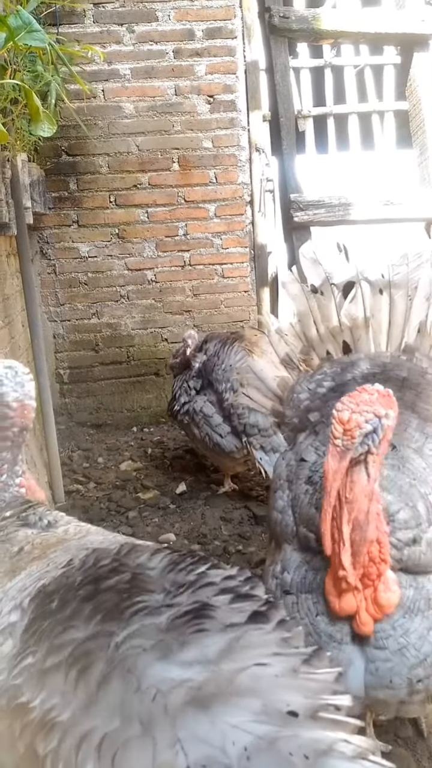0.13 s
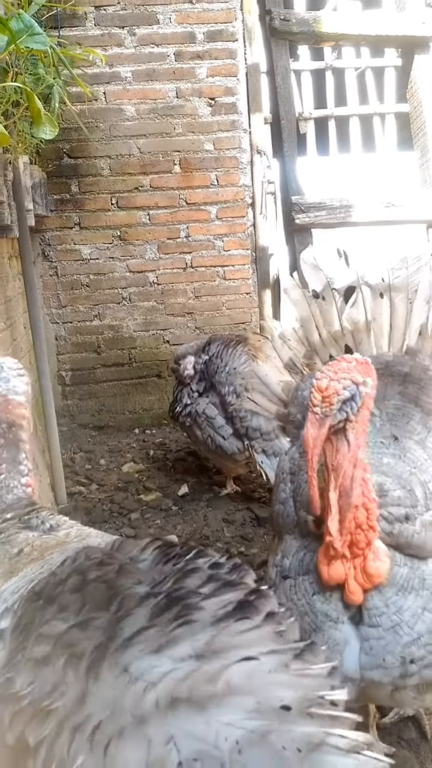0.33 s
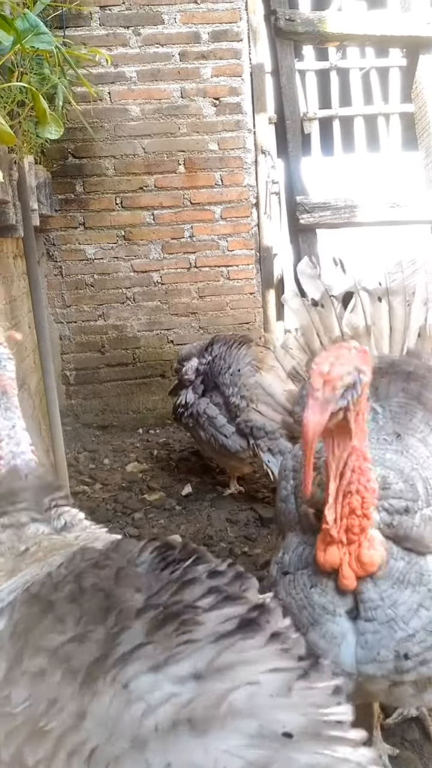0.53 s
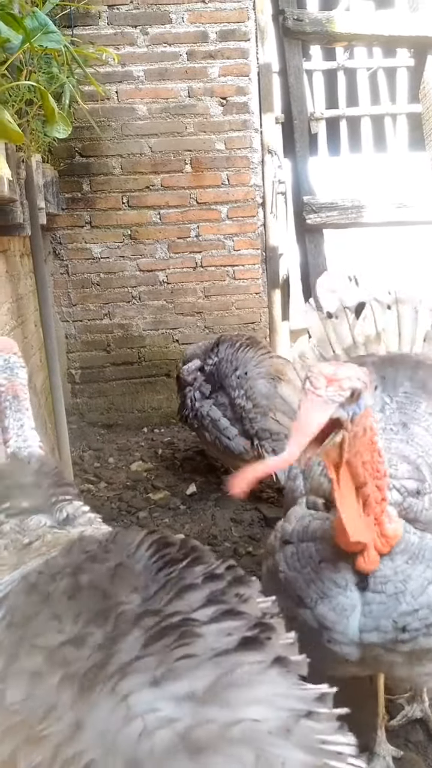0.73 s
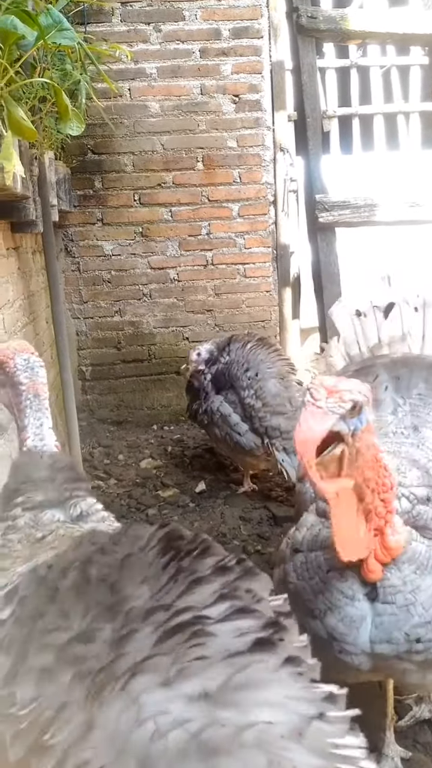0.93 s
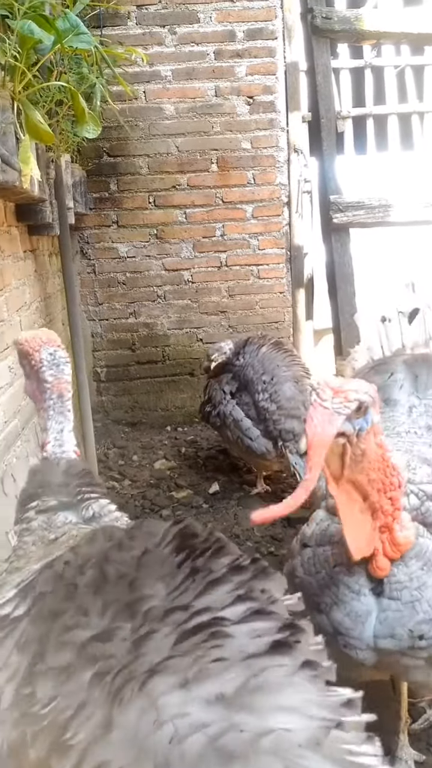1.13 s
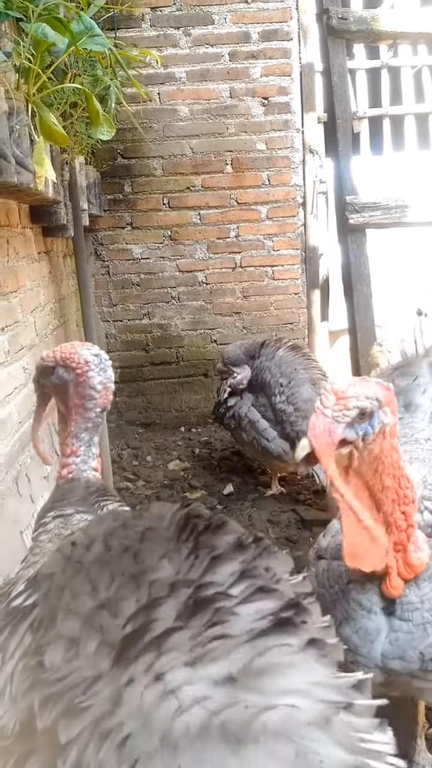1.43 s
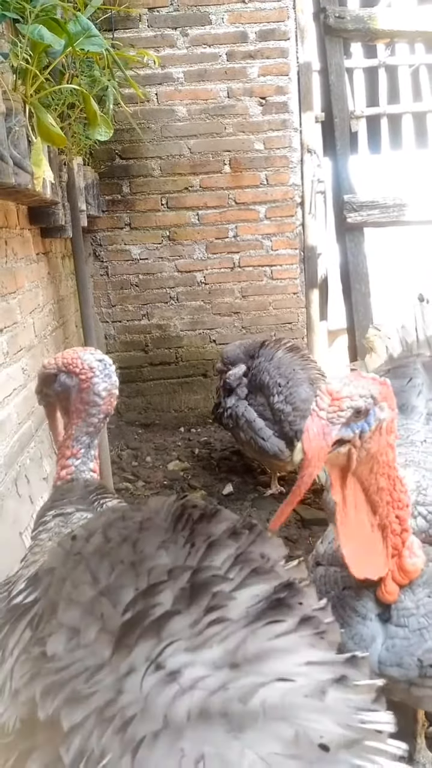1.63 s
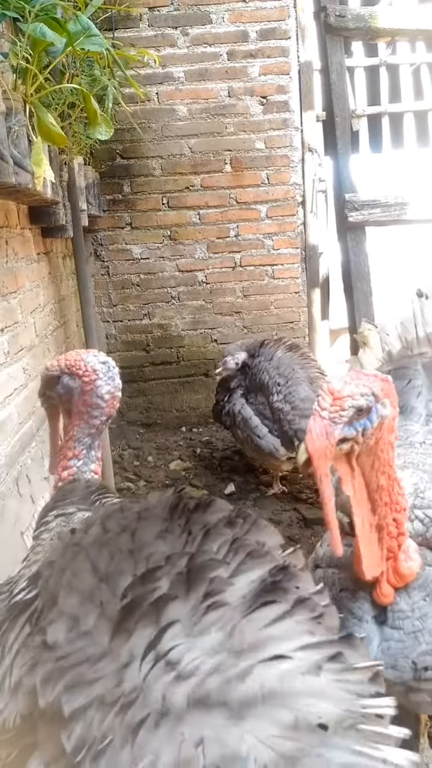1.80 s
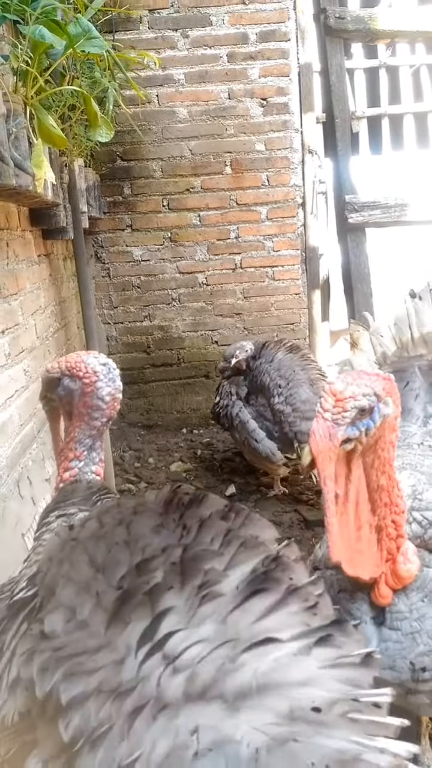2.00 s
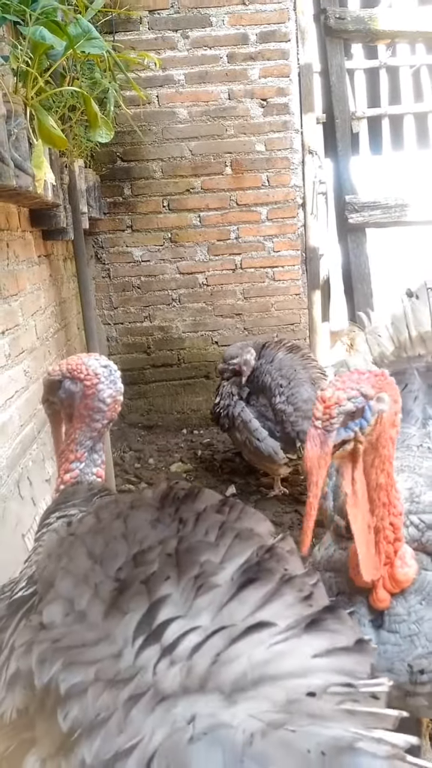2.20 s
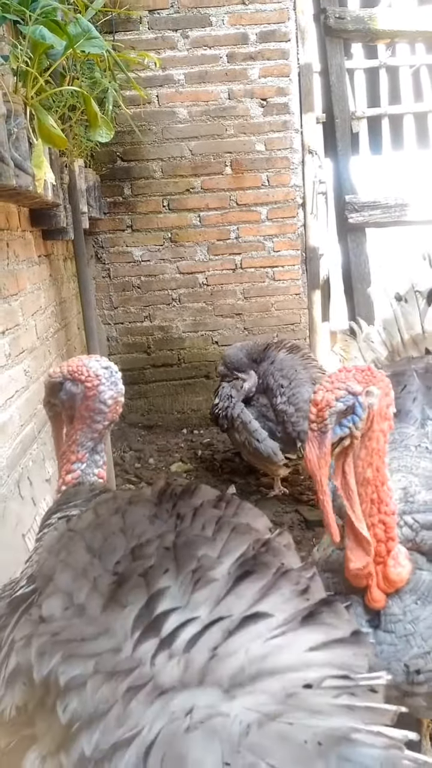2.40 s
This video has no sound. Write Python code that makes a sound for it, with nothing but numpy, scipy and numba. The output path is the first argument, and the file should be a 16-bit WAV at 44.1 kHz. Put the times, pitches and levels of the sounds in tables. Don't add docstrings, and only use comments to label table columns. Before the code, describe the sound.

Turkey gobbling, close and loud in a small walled yard. After near quiet, the nearest bird starts at 0.2 seconds with fast, clear, rising nasal notes, peaking in an open cry near 0.6. Hoarse birds roll along behind while another answers with gulps and squawks until 1.2. Then faint, blurred far calls fade by about 2.1, leaving soft hiss, thin insect whine and tiny feather ticks near 2.3.

```python
import sys
import numpy as np
from scipy import signal
from scipy.fft import rfft, irfft
from scipy.io import wavfile
from scipy.ndimage import uniform_filter1d
from numba import njit

SR = 44100
rng = np.random.default_rng(int(sys.argv[2]) if len(sys.argv) > 2 else 0)


def field_ratio(decibels):
    return 10 ** (np.asarray(decibels, dtype=float) / 20)


def inscribe(sig):
    pcm = np.round(np.clip(np.atleast_2d(sig).T, -1, 1) * 32767)
    wavfile.write(sys.argv[1], SR, pcm.astype(np.int16))


N = 112454
t = np.arange(N) / SR

# frequency [Hz], level [dB per Hz].
HUM_SPECTRUM = [(18, -50.5), (30, -23.5), (86, -2), (236, -26.5), (450, -21), (580, -54), (990, -120)]
# frequency [Hz], level [dB per Hz].
AIR_SPECTRUM = [(18, -34.5), (30, 2), (4400, -18.5), (4750, -10), (5270, -18), (14000, -22.5)]
# frequency [Hz], width [Hz], level [dB].
INSECT_LINES = [(4745, 130, -72), (5700, 70, -88), (3700, 90, -88)]
# start [s], length [s], level [dB], centre [Hz].
RUSTLES = [
    (0.006, 0.0176, -68.5, 2100),
    (1.552, 0.078, -64.5, 10330),
    (2.265, 0.0022, -64, 3530),
    (2.266, 0.003, -58.5, 1300),
    (2.285, 0.0045, -59.5, 2000),
]
# centre [Hz], width [Hz], level [dB] with closed beak, level [dB] with open beak.
THROAT = [(620, 200, -12.5, 4), (1300, 379, -8.5, -2), (2200, 390, -15.5, 5.5), (3130, 390, -20, -8),
          (4010, 990, -31, -2), (5840, 580, -46.5, -20), (8030, 1400, -38, -11.5), (10360, 1300, -34, -13),
          (12500, 3700, -55, -25.5), (218, 130, -30, -24.5)]
# time [s], level [dB], pitch [Hz], beak opening [0-1],
# mouth resonance [Hz].
LEAD_FIRST_RUN = [
    [(.182, -52, 471.6, 0.94, 2200), (.2, -25, 548.6, 0.28, 2473), (.212, -15.5, 600, 0.1, 2575),
     (.234, -14, 584.7, 0.2, 2527), (.241, -25, 544, 0.2, 2400), (.25, -21, 587, .2, 2300),
     (.272, -23, 584.5, 0.2, 2252)],
    [(.274, -20.5, 634.3, 0, 1300), (.291, -4, 674.5, 0, 1300), (.302, -11.5, 697, 0.3, 1600),
     (.318, -11, 718, 0.35, 1750), (.326, -20, 677, 0.75, 1490), (.334, -13.5, 641, 0.94, 850),
     (.342, -24.5, 640, 0.5, 1300)],
    [(.344, -18, 537.6, 0.1, 2150), (.356, -12, 571.2, 0.44, 2300), (.368, -14.5, 608.5, 0.48, 2300),
     (.378, -14, 645, 0.37, 1630), (.397, -5, 665.7, 0.24, 1364), (.415, -15, 656.8, 0.55, 1300),
     (.432, -10.5, 639.5, 0.7, 640), (.455, -26.5, 600, 0.7, 640)],
]
LEAD_SECOND_RUN = [
    [(.468, -29, 647.3, 0.3, 1437), (.49, -13.5, 640, 0.47, 1336), (.515, -20, 603.4, 0.4, 699),
     (.544, -11.5, 672, 0.8, 718), (.556, -20, 685, 0.64, 1327), (.568, -9, 683, 0.3, 1034),
     (.575, -9, 614, .9, 1356)],
    [(.578, -14.5, 665.5, .7, 3990), (.587, -6.5, 640, 1, 4101), (.595, -14, 618.5, 0.5, 3297),
     (.605, -13.5, 607.5, 0.45, 2885), (.622, -14, 606, 0.3, 2850), (.636, -11.5, 641.6, 0.57, 3289),
     (.652, -10, 716, 0.9, 3995), (.672, -30, 686, 1, 3940)],
]
LEAD_ROUGH = [.07, .04, .04, .18, .02]
# level [dB], width [Hz], lift [dB] of the 3, 4 and 6 kHz resonances.
LEAD_MOUTH = [(0.5, 580, 0, -8.5, -7.5), (3.5, 630, 0, -7.5, -2.5), (2.5, 360, -6, 4.5, 3.5),
              (2.5, 670, 2, -1, -6.5), (-5.5, 1300, -2, 3.5, -6)]
# time [s], level [dB].
FLOCK_LEVEL = [(0.191, -39.5), (.3, -29), (.41, -23), (.46, -17), (0.559, -18), (.595, -28.5), (.635, -28),
               (0.681, -20), (.85, -20), (1.0, -25), (1.16, -24), (1.36, -67)]
FLOCK_PITCH = [560, 600, 640]
# start [s], length [s], level
# [dB], pitch [Hz], mouth resonance [Hz].
CLEAR_SQUAWKS = [(.322, .014, -22, 669.6, 3380), (.486, 0.014, -22, 691.6, 4200),
                 (.505, 0.017, -29, 651, 3040), (.545, 0.015, -21, 663, 4030),
                 (.569, 0.0058, -22, 662, 3900), (.826, 0.034, -12, 715.7, 2000),
                 (.972, 0.027, -30, 645, 1970), (1.018, .013, -36, 660, 1930),
                 (1.046, 0.035, -20, 644.6, 2390), (1.088, 0.031, -31, 649, 2040),
                 (1.160, 0.02, -20.5, 586.6, 2340)]
HOARSE_SQUAWKS = [
    (.418, 0.0063, -36, 561.6, 3300),
    (.468, .012, -24, 600, 2400),
    (.718, 0.015, -26, 620, 4270),
    (.754, 0.024, -16.5, 615, 2610),
    (.905, 0.042, -30.5, 600, 3240),
    (.945, 0.018, -20.5, 620, 2390),
    (1.138, 0.017, -25.5, 560, 3230),
    (1.195, 0.023, -44, 560, 3300),
]
# start [s], length [s], level [dB], pitch [Hz].
GULPS = [(0.662, 0.011, -19, 536), (0.694, 0.016, -33.5, 547), (0.755, 0.0069, -15, 530),
         (.773, 0.015, -12, 539), (.798, 0.015, -23.5, 539), (0.817, 0.017, -8.5, 492),
         (0.854, 0.018, -28, 477), (.865, 0.0088, -18.5, 549), (.908, 0.0096, -17, 527),
         (.918, 0.014, -25, 313), (.716, 0.012, -25.5, 308), (0.939, 0.023, -20, 506),
         (1.037, 0.014, -21.5, 479), (1.128, 0.0041, -13.5, 506), (1.142, 0.02, -25.5, 491.6),
         (1.164, 0.0093, -20, 554)]
# centre [Hz], width [Hz], level [dB].
GULP_THROAT = [(540, 150, -14), (1020, 150, 0), (2300, 700, -30), (3200, 800, -34)]
# start [s], length [s], level [dB], pitch [Hz], mouth resonance [Hz].
FAR_CALLS = [(1.236, 0.1, -41, 620, 1340), (1.29, 0.1, -51.5, 575, 2540), (1.36, 0.11, -44, 563, 3360),
             (1.37, 0.1, -50, 643, 2090), (1.43, 0.085, -49, 571.5, 1177), (1.53, 0.12, -48.5, 640, 1925),
             (1.54, 0.095, -50, 538, 3090), (1.635, 0.12, -47, 551, 3154),
             (1.745, 0.1473, -53, 624.3, 1953), (1.75, 0.14, -54, 525.5, 3110),
             (1.982, 0.11, -50, 640, 1938), (1.99, 0.11, -51, 560, 3150)]
# centre [Hz], width [Hz], level [dB].
FAR_THROAT = [(600.4, 90, 0), (1114, 240, 0), (1981, 86, -10.5), (2300, 293, -11), (3404, 560, -27),
              (3868, 560, -23)]


def unit(x):
    return x / np.sqrt(np.mean(x ** 2))


def walk(rate, size=N):
    k = int(SR / rate)
    steps = np.repeat(rng.standard_normal(size // k + 1), k)
    return 1.3 * uniform_filter1d(uniform_filter1d(steps, k), k)[:size]


def coloured(points):
    hz, db = np.array(points).T
    f = np.arange(N // 2 + 1) * SR / N + 1
    gain = field_ratio(np.interp(np.log(f), np.log(hz), db))
    return unit(irfft(rfft(rng.standard_normal(N)) * gain, N))


@njit
def svf(x, hz, width):
    y, b, l = np.empty(len(x)), 0., 0.
    for i in range(len(x)):
        g, k = np.tan(np.pi * hz[i] / SR), width / hz[i]
        v = (b + g * (x[i] - l)) / (1 + g * (g + k))
        b, l, y[i] = 2 * v - b, l + 2 * g * v, k * v
    return y


def ring(x, hz, width):
    hz = hz + np.zeros(len(x))
    width = 1. * width
    return svf(svf(x, hz, width), hz, width)


def shape(u, length, attack_s, release_s):
    return np.clip(u / attack_s, 0, 1) ** 2 * np.exp(-np.clip(u - length, 0, None) / release_s)


def add(out, start, x):
    i = int(start * SR)
    out[i:i + len(x)] += x[:N - i]


def hum(birds):
    gate_s, hum_db, rise_per_db = 0.016, -45.5, 0.38
    calls_db = 10 * np.log10(uniform_filter1d(birds ** 2, int(gate_s * SR)) + 1e-8)
    return coloured(HUM_SPECTRUM) * field_ratio(hum_db + rise_per_db * calls_db)


def rustles():
    out = np.zeros(N)
    for s, length, db, hz in RUSTLES:
        burst = unit(ring(rng.standard_normal(N), hz, 0.6 * min(hz, 4000)))
        out += burst * field_ratio(db) * shape(t - s, length, length, 0.0144 + 0.41 * length)
    return out


def insect():
    out = np.zeros(N)
    ducking_db = np.interp(t, [1.2, 2.2], [-5, 0])
    for hz, width, db in INSECT_LINES:
        line = unit(ring(rng.standard_normal(N), hz, width))
        out += line * field_ratio(db + 1.4 * walk(25) + ducking_db)
    return out


def background(birds):
    return hum(birds) + coloured(AIR_SPECTRUM) * field_ratio(-73) + insect() + rustles()


def voice(hz, rough, opening, throat, mouth=None):
    n = len(hz)
    jitter, breath_db, hiss_db, shimmer_db, patchy_db = .12, 4, -3, 5, 2
    blur = .018 + .25 * rough
    phase = 2 * np.pi * np.cumsum(hz * (1 + jitter * rough * walk(300, size=n))) / SR
    pulses = np.zeros(n)
    for k in range(1, 27):
        partial = np.cos(k * phase + blur * k * walk(700, size=n)) * (k * hz < 15000)
        pulses += partial * field_ratio(patchy_db * min(k / 4, 1.5) * walk(60, size=n))
    noise = (1 + np.cos(phase)) * rng.standard_normal(n)
    source = pulses + field_ratio(breath_db) * 3 * rough * noise + field_ratio(hiss_db) * 3 * np.gradient(noise)
    out = np.zeros(n)
    for k, (centre, width, shut_db, *open_db) in enumerate(throat):
        wide_db = open_db[0] if open_db else shut_db
        gain = field_ratio(shut_db + (wide_db - shut_db) * np.clip(opening, 0, 1.3))
        out += (-1) ** k * gain * ring(source, centre, 1.2 * width)
    if mouth:
        mouth_hz, mouth_db, mouth_width = mouth
        out = out + field_ratio(mouth_db) * ring(source, mouth_hz, mouth_width)
    out = out / np.sqrt(uniform_filter1d(out ** 2, 400) + 1e-9)
    return out * field_ratio(shimmer_db * rough * walk(150, size=n))


def lead():
    out = np.zeros(N)
    for rows, rough, mouth in zip(LEAD_FIRST_RUN + LEAD_SECOND_RUN, LEAD_ROUGH, LEAD_MOUTH):
        s, db, hz, opening, mouth_hz = np.array(rows).T
        mouth_db, mouth_width, *lifts = mouth
        lifted = [(f, w, shut + lift, wide + lift) for (f, w, shut, wide), lift in zip(THROAT[3:], lifts)]
        throat = THROAT[:3] + lifted + THROAT[6:]
        u = np.arange(s[0], s[-1] + .03, 1 / SR)
        at = lambda v: uniform_filter1d(np.interp(u, s, v), 300)
        note = voice(at(hz), rough, at(opening), throat, (at(mouth_hz), mouth_db, mouth_width))
        add(out, s[0], note * field_ratio(at(db)) * shape(u - s[0], s[-1] - s[0], 0.0025, 0.001))
    return out


def flock():
    s, db = np.array(FLOCK_LEVEL).T
    throat = [(643, 290, 0.014, 0.00083)] + THROAT[1:]
    birds = np.zeros(N)
    for hz in FLOCK_PITCH:
        birds += voice(hz * (1 + .03 * walk(14)), 0.23, .2, throat) * field_ratio(5.3 * walk(35))
    return unit(birds) * field_ratio(-3.5 + np.interp(t, s, db, -90, -90))


def notes(rows, rough, throat, opening, attack_s, release_s, fade_db, wobble, mouth_db=0, rise=0):
    arch, mouth_width_hz = .03, 350
    out = np.zeros(N)
    for s, length, db, hz, *mouth_hz in rows:
        u = np.arange(0, length + .1, 1 / SR)
        done = np.clip(u / length, 0, 1)
        bend = rise * (done - .5) - arch * (2 * done - 1) ** 2
        pitch = hz * (1 + bend + wobble * walk(70, size=len(u)))
        mouth = (mouth_hz[0], mouth_db, mouth_width_hz) if mouth_hz else None
        call = voice(pitch, rough, opening, throat, mouth)
        add(out, s, call * field_ratio(db + fade_db * u / length) * shape(u, length, attack_s, release_s))
    return out


def squawks():
    beak = THROAT[:2] + [(2400, 420, -5.5)] + THROAT[3:]
    cries = np.zeros(N)
    for rows, rough in [(CLEAR_SQUAWKS, .1), (HOARSE_SQUAWKS, .42)]:
        cries += notes(rows, rough, beak, 0.83, attack_s=.011, release_s=0.0054, fade_db=-2.5,
                       wobble=.012, mouth_db=2.5)
    effort = 10 * uniform_filter1d(abs(cries), 400)
    return cries + field_ratio(-40.5) * effort * unit(ring(rng.standard_normal(N), 290, 250))


def gulps():
    return notes(GULPS, .13, GULP_THROAT, 0, attack_s=0.006, release_s=0.0054, fade_db=0,
                 wobble=.015, rise=.05)


def far_birds():
    return notes(FAR_CALLS, 0.155, FAR_THROAT, 0, attack_s=0.0076, release_s=0.073, fade_db=-9,
                 wobble=.032, mouth_db=-10.5)


def yard(x, t60):
    u = t[:SR // 2]
    dull = signal.sosfilt(signal.butter(1, 4500, fs=SR, output="sos"), x)
    echoes = unit(rng.standard_normal(len(u))) * np.exp(-np.log(1000) * u / t60)
    return signal.fftconvolve(dull, echoes * np.sqrt(14 / t60 / SR))[:N]


def treble(x):
    return signal.sosfilt(signal.butter(8, 6100, "high", fs=SR, output="sos"), x)


def scene():
    near = lead() + flock() + squawks() + gulps()
    far = far_birds()
    birds = near + field_ratio(-10) * yard(near, 0.39) + 0.25 * far + 1.15 * yard(far, 0.2)
    mid = birds + background(birds)
    side = field_ratio(-13) * treble(treble(mid) * unit(walk(900)))
    return np.array([mid + side, mid - side])


def top_cut(x):
    return signal.sosfilt(signal.butter(12, 14820, fs=SR, output="sos"), x)


def record(dry):
    limit = 0.88
    mid = dry.mean(axis=0)
    rounded = dry - mid + limit * np.tanh(mid / limit)
    x = signal.sosfilt(signal.butter(3, 70, "high", fs=SR, output="sos"), rounded)
    x = signal.sosfilt(signal.ellip(8, .5, 60, 14300, fs=SR, output="sos"), x)
    return top_cut(x)


dry = scene()
out = record(dry)
inscribe(out)
```